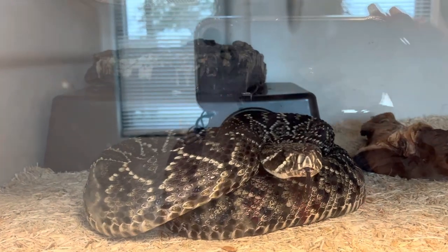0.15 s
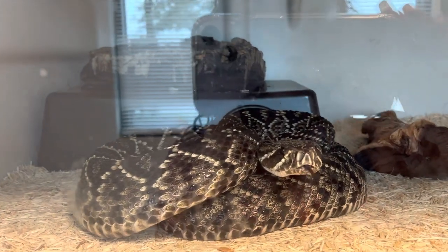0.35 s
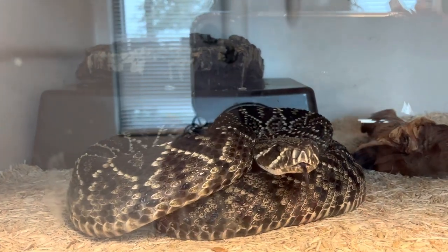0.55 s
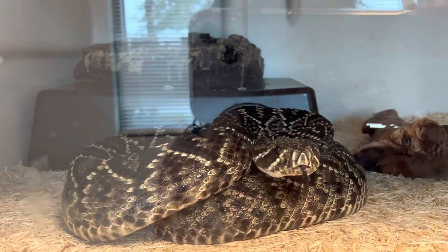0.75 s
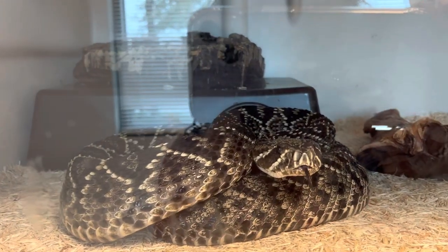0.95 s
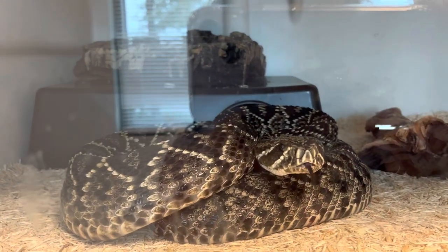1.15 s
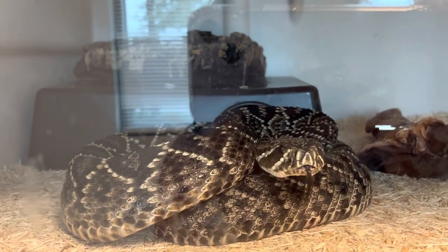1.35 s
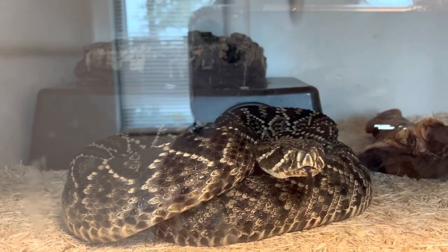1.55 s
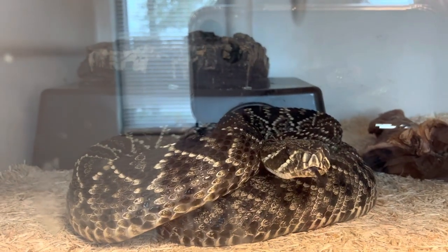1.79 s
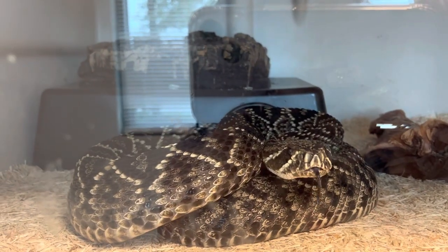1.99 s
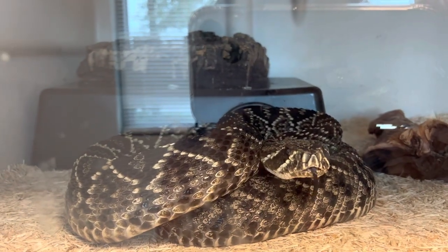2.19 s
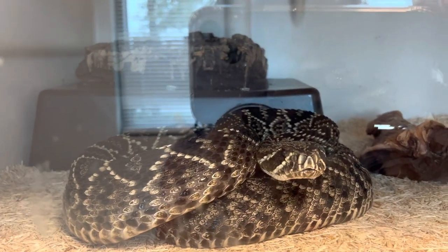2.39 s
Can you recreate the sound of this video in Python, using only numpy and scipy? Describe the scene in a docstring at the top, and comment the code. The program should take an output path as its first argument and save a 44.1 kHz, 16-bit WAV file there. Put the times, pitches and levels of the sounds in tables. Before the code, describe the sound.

A rattlesnake shakes its tail without a break, a harsh, dry, high buzz of dense tiny clicks fluttering about twenty-one times a second, close to a phone at a glass box; soft low room rumble behind.

```python
"""A coiled rattlesnake shakes its tail about 21 times a second in a glass-fronted box, close to a phone.
Each shake throws the hollow segments together in a burst of tiny clicks that ring the shells and the box;
single hard knocks sound a few milliseconds into some of the shakes.
The room behind adds a low ventilation rumble and a faint hiss, made of filtered noise in both microphone ports."""
import sys
import numpy as np
from scipy import signal
from scipy.fft import rfft, irfft, next_fast_len
from scipy.io import wavfile
from scipy.ndimage import uniform_filter1d

SR = 44100
rng = np.random.default_rng(int(sys.argv[2]) if len(sys.argv) > 2 else 0)


def master_out(mix):
    """Clip the mix to full scale and print it as 16-bit PCM to the path in sys.argv[1]."""
    frames = np.transpose(np.atleast_2d(mix))
    ceiling = np.clip(frames, -1, 1)
    pcm = np.round(ceiling * 32767).astype(np.int16)
    wavfile.write(sys.argv[1], SR, pcm)


N = 107163
SIZE = next_fast_len(N + SR // 2)
HZ = np.arange(SIZE // 2 + 1) * SR / SIZE

# colour of the room noise: pitch_hz, level_db (relative, per Hz)
ROOM_COLOUR = [(12, -24), (20, -34), (60, 1), (107, -3.5), (146, -4), (213, -12.5), (301, -15.5),
               (367, -21.5), (447, -21), (653, -33), (1030, -20.5), (1500, -26.5), (1950, -33),
               (3300, -120)]
# duct resonances: pitch_hz, width_hz, level_db (over the rumble)
DUCT_HUMS = [(57, 28, 3.5), (137.5, 8.3, 7.5), (163.2, 9.2, 11.5), (286, 10.7, 10)]
# room noise between the ports: pitch_hz, likeness (0-1), left_minus_right_db, right_lead_rad
ROOM_PAIR = [(40.4, 0.93, .3, 0.0078), (147, 0.93, 2, 0.16), (380, 0.74, 1.5, 0.15), (600, 0.52, 2, 1.23),
             (940, 0.96, 3, 1.46), (1410, 0.9, 1, 1.63)]
# small random wander of the rumble level: time_s, level_db (relative)
ROOM_WANDER = [(0, 0.5), (.4, 0), (.85, 1), (1.3, 0), (1.9, .6), (2.43, 0.5)]
# broad colour of a click through the glass: pitch_hz, level_db (relative)
SHELL_COLOUR = [(900, -68), (1200, -41), (1650, -17.5), (2000, -18), (2400, -10.5), (2800, -3), (3300, -2),
                (3900, -11.5), (4400, -3.5), (5300, -4.5), (5800, -13.5), (6250, -73), (6800, -52),
                (7600, -60)]
# bright edge of a click: pitch_hz, level_db (relative)
EDGE_COLOUR = [(4000, -50), (5600, -12), (6200, -1), (7000, -1.5), (8000, 0), (8600, 2), (9500, -.7),
               (11000, -2), (13000, -3.7), (15300, -2.2)]
# phase of the right channel against the left in the bright edge: pitch_hz, right_lead_half_turns
EDGE_PHASE = [(6300, 0), (7500, 0), (9250, 1), (10700, 1), (11900, 2), (13750, 2), (15200, 3)]
# rings of shells and box: pitch_hz, width_hz, level_db (relative), left_minus_right_db, right_lead_rad
RINGS = [(1611, 17.6, -9.5, 13, -9.5), (2404, 42, -12.5, 25.5, -1.7), (2818, 51, 2, -3.5, -1.3),
         (2933, 41, -17, 11, -4.5), (3105, 33, -9.5, -18, -5), (3255, 20, 0.5, -1, 6),
         (3630, 72, -0.5, -1, -3), (3860, 92, 3, 10, 4), (4120, 31, -2.6, 25.5, 0.5),
         (4620, 19, -5, 9, 4.3), (4780, 54, -5, 11, -0.3), (5032, 54, 3, 8.5, 2.05),
         (5607, 63, 4.5, 1.7, 2), (5866, 34, -1, -4, -0.5)]
# segments down the chain, large to small: pitch_hz
SEGMENT_HZ = [2750, 3360, 4260, 5940]
# one row a shake: start_s, level_db (relative), small_minus_large_segments_db
SHAKES = [(-0.012, -46, -2), (0.031, -45.0, 3.5), (0.076, -45.0, 0), (0.128, -45, -5.5), (0.182, -48, -2.5),
          (0.226, -44, -0.5), (0.273, -44, -0.5), (0.321, -44, -2), (0.375, -43.5, 1.5), (0.413, -43, -3.2),
          (0.46, -44, 2), (0.507, -43.5, 0), (0.555, -43, -3.5), (0.6, -44, -2), (0.648, -43, 2),
          (0.689, -45, -3.5), (0.729, -42, 2.8), (0.777, -43, -1.5), (0.821, -42.5, 3.8),
          (0.869, -42.5, 3.5), (0.91, -43.3, 3), (0.96, -43, 2.4), (1.007, -45, 0), (1.053, -42.5, -5.5),
          (1.098, -44, 2), (1.145, -42, 0), (1.189, -44, -3), (1.236, -42, -3.5), (1.284, -42.5, 3),
          (1.33, -44.3, 1.5), (1.375, -43, 2.5), (1.421, -44, -3), (1.461, -45, 4), (1.515, -43.5, -0.5),
          (1.563, -43, 3), (1.61, -42.5, -2.5), (1.656, -44.5, 0), (1.705, -42.5, 1.5),
          (1.752, -43.5, -0.5), (1.8, -44.5, 2.5), (1.847, -41.5, 1), (1.894, -43.5, -1),
          (1.941, -41.5, 0.5), (1.984, -43.5, -4), (2.029, -43, -7), (2.074, -43.7, 4.5),
          (2.125, -42.5, -1.5), (2.177, -46, 3.5), (2.222, -44.5, 0), (2.273, -43, 5.5), (2.318, -45, -3),
          (2.367, -44, -2.5), (2.416, -44.5, 6)]
# how far the rattle throbs: time_s, depth (0-1)
THROB_DEPTH = [(0, 0.66), (.25, 0.61), (.5, .4), (1.0, 0.32), (1.3, 0.48), (1.8, 0.39), (2.43, .5)]
# single hard knocks: start_s, level_db (before rise, glass and box), pitch_hz
KNOCKS = [(0.1865, -33.5, 3460), (0.2289, -32.5, 2970), (0.3237, -28, 4120), (0.3835, -35.5, 2834),
          (0.6534, -33, 5020), (0.7846, -27, 5140), (0.9652, -32, 4950), (1.0555, -31, 4680),
          (1.1932, -31.5, 5030), (1.2386, -32.5, 2900), (1.4262, -34, 4040), (1.5189, -36.5, 3010),
          (1.6182, -40, 4950), (1.7095, -43, 4800), (1.8512, -33, 3900), (1.8991, -29, 4180),
          (2.1345, -31, 4800), (2.2273, -31, 4660)]

ROOM_DB = -50.5  # rms over both ports, before the level wander
BOX_T60_S, BOX_LEFT_DB = 0.11, -0.5  # decay; left minus right of the shell sound and knocks
BOX_DB, EDGE_BOX_DB, KNOCK_BOX_DB = 0.5, -2.5, -8  # scatter against direct sound
GLASS_HZ = 2210  # the scatter of the shell sound leaks out above this
KNOCK_T60_S, KNOCK_RISE_S = 0.046, 0.00092
CLICKS_PER_S, CLICK_SCATTER_DB = 4520, 2  # in each stream of clicks
CLUSTERS_PER_S, CLUSTER_DB = 170, 1  # uneven crowding of the clicks
ATTACK_S, HOLD_S, FALL_S = 0.0037, 0.011, 0.015  # burst of one shake, hold counted from its start
SEGMENT_OCTAVES, SEGMENT_LAG_S = 0.24, 0.0011  # reach around its pitch, delay down the chain
SEGMENT_JITTER_S, SEGMENT_SCATTER_DB = 0.002, 1.22  # each segment joins each shake unevenly
RINGS_DB, RING_SCATTER_DB = -3.5, 1.5  # each shake strikes each ring differently
EDGE_DB, EDGE_THROB = -13, -0.24  # a negative power evens out the throb of the edge
EDGE_SPLIT_HZ = 10000  # half of the segments click below, half above
RATTLE_GAIN = 2.73
TOP_HZ = 15750


def undb(db):
    """dB to gain."""
    return 10 ** (np.asarray(db) / 20)


def along_hz(table, axis):
    """One column of a table on a log-frequency axis."""
    rows = np.array(table)
    return np.interp(np.log(HZ + 1), np.log(rows[:, 0]), rows[:, axis])


def room():
    """Ventilation rumble and hiss: noise coloured by the ducts, partly shared between both ports."""
    hums_db = sum(db / (1 + (2 * (HZ - hz) / width) ** 2) for hz, width, db in DUCT_HUMS)
    colour = undb(along_hz(ROOM_COLOUR, axis=1) + hums_db)
    shared, separate = rfft(rng.standard_normal((2, SIZE))) * colour
    like = np.clip(along_hz(ROOM_PAIR, axis=1), 0, 1)
    pan = undb(along_hz(ROOM_PAIR, axis=2) / 2)
    lead = np.exp(1j * along_hz(ROOM_PAIR, axis=3))
    right = (like * shared + np.sqrt(1 - like ** 2) * separate) * lead
    noise = irfft(np.array([shared * pan, right / pan]), SIZE)[:, :N]
    wander_db = np.interp(np.arange(N) / SR, *np.array(ROOM_WANDER).T)
    return noise / noise.std() * undb(ROOM_DB + wander_db)


def box():
    """Decaying scatter of the glass box, unrelated left and right, energy 1 a side."""
    t = np.arange(SR // 4) / SR
    tail = rng.standard_normal((2, len(t))) * np.exp(-np.log(1000) * t / BOX_T60_S)
    return rfft(tail / np.sqrt(np.sum(tail ** 2, axis=1, keepdims=True)), SIZE)


def knocks(shell):
    """Hard single knocks: a short ring at their own pitch, heard through the glass and scattered by the box."""
    t = np.arange(SR // 10) / SR
    envelope = (1 - np.exp(-t / KNOCK_RISE_S)) * np.exp(-np.log(1000) * t / KNOCK_T60_S)
    ring = np.zeros(SIZE)
    for start_s, level_db, hz in KNOCKS:
        first = int(start_s * SR)
        ring[first:first + len(t)] += undb(level_db) * np.sin(2 * np.pi * hz * t) * envelope
    return rfft(ring) * shell * (1 + undb(KNOCK_BOX_DB) * box())


def clicks():
    """Dense segment impacts of uneven size and either sign, each one sample long, rms 1."""
    chance, size, sign = rng.random(N), rng.exponential(size=N), rng.standard_normal(N)
    # the last 300 a second fade towards nothing
    hit = np.clip((CLICKS_PER_S / SR - chance) * SR / 300, 0, 1)
    impacts = hit * undb(CLICK_SCATTER_DB * np.minimum(size, 2)) * np.clip(sign, -2, 2)
    return impacts / impacts.std()


def walk(rate):
    """Random levels held 1 / rate s and slewed; spread near 1."""
    hold = int(SR / rate)
    steps = np.repeat(rng.standard_normal(N // 100), hold)[:N]
    return 1.63 * uniform_filter1d(steps, hold)


def throb(force_db, late_s):
    """Each shake: a sudden jolt, a short hold, then the segments settle into a steadier bed."""
    t, starts = np.arange(N) / SR, np.array(SHAKES)[:, 0]
    joined = starts + late_s + SEGMENT_JITTER_S * rng.standard_normal(len(starts))
    since = t - joined[:, None]
    burst = np.clip(since / ATTACK_S, 0, 1) * np.exp(-np.clip(since - HOLD_S, 0, 1) / FALL_S)
    pulses = (undb(force_db) @ burst) / burst.sum(axis=0).mean()
    bed = undb(np.interp(t, starts + HOLD_S, force_db))
    depth = np.clip(np.interp(t, *np.array(THROB_DEPTH).T), 0, 1)
    return ((1 - depth) * bed + depth * pulses) * undb(CLUSTER_DB * walk(CLUSTERS_PER_S))


def per_shake(values):
    """Holds one value from each shake to the next."""
    shake = np.searchsorted(np.array(SHAKES)[:, 0], np.arange(N) / SR) - 1
    return values[np.maximum(shake, 0)]


def rings(segment, gain, side):
    """Shell and box resonances nearest one segment's pitch, struck by that segment's throb of clicks."""
    total = 0
    for hz, width, db, pan_db, lead in RINGS:
        if np.argmin(np.abs(np.log(hz / np.array(SEGMENT_HZ)))) == segment:
            scatter_db = RING_SCATTER_DB * rng.standard_normal(len(SHAKES))
            struck = rfft(clicks() * gain * per_shake(undb(scatter_db)), SIZE)
            resonance = 1 / (1 + 1j * (HZ - hz) / width) ** 2
            stereo = undb(RINGS_DB + db + side * pan_db) * np.exp(-1j * side * lead)
            total = total + struck * stereo * resonance
    return total


def rattle():
    """Each segment clicks into its share of rings and box; the right of the bright edge leads in phase."""
    _, level_db, small_db = np.array(SHAKES).T
    side = np.array([[.5], [-.5]])  # left, right
    shell = undb(along_hz(SHELL_COLOUR, axis=1) + side * BOX_LEFT_DB) / np.sqrt(1 + undb(2 * BOX_DB))
    reach = np.array([1 / (1 + (np.log2((HZ + 1) / hz) / SEGMENT_OCTAVES) ** 2) for hz in SEGMENT_HZ])
    reach /= np.sqrt(np.sum(reach ** 2, axis=0))
    high = 1 / (1 + (EDGE_SPLIT_HZ / (HZ + 1)) ** 6)
    share = np.sqrt([1 - high, high]) / np.sqrt(2)
    leak = 1 / (1 + (GLASS_HZ / (HZ + 1)) ** 10)
    body, bright = 0, 0
    for k, place in enumerate(np.linspace(-.5, .5, len(SEGMENT_HZ))):
        force_db = level_db + SEGMENT_SCATTER_DB * rng.standard_normal(len(SHAKES))
        gain = throb(force_db + place * small_db, k * SEGMENT_LAG_S)
        hits = clicks()
        wet = undb(BOX_DB) * box() * leak
        body = body + reach[k] * rfft(hits * gain, SIZE) * shell * (1 + wet)
        body = body + rings(k, gain, side)
        edge = throb(force_db, k * SEGMENT_LAG_S)
        edge_hits = rfft(hits * edge * (edge / edge.mean()) ** EDGE_THROB, SIZE)
        # the edge takes one scatter for both channels
        bright = bright + edge_hits * (1 + undb(EDGE_BOX_DB) * box()[0]) * share[k % 2]
    right_lead = np.exp(-1j * side * np.pi * np.interp(HZ, *np.array(EDGE_PHASE).T))
    bright = bright * undb(EDGE_DB + along_hz(EDGE_COLOUR, axis=1)) * right_lead
    return irfft(RATTLE_GAIN * (body + bright) + knocks(shell), SIZE)[:, :N]


def scene():
    """Close rattle over the room."""
    return rattle() + room()


def record(dry):
    """The phone cuts the top with a steep low-pass."""
    return signal.sosfilt(signal.ellip(16, .3, 70, TOP_HZ, fs=SR, output="sos"), dry)


dry = scene()
out = record(dry)
master_out(out)
```